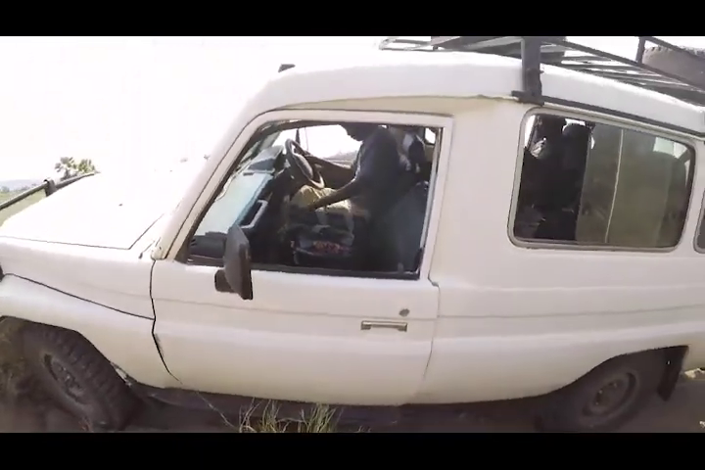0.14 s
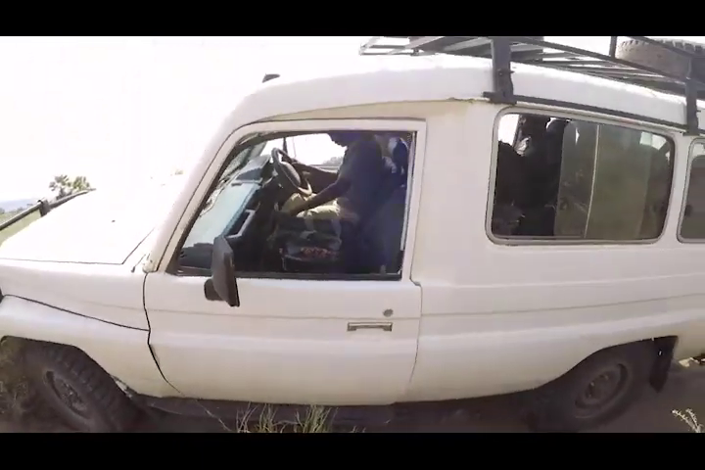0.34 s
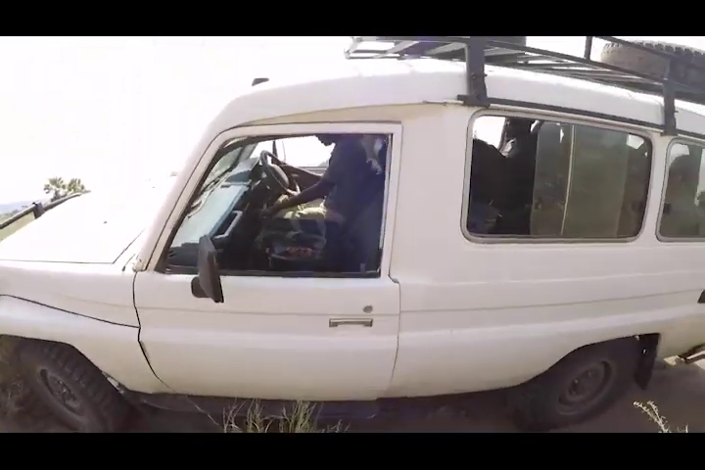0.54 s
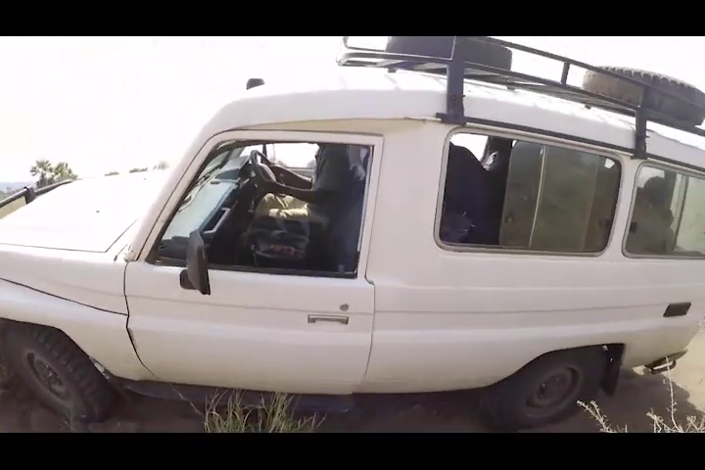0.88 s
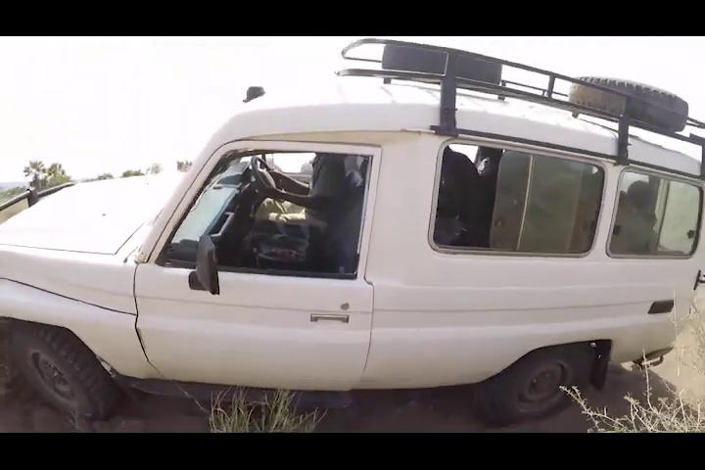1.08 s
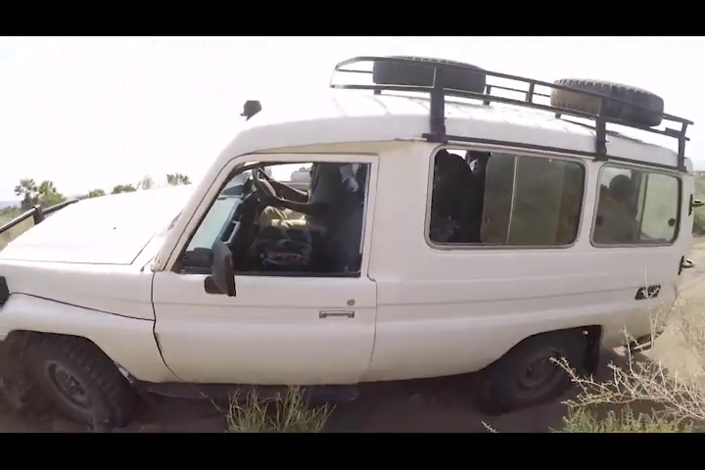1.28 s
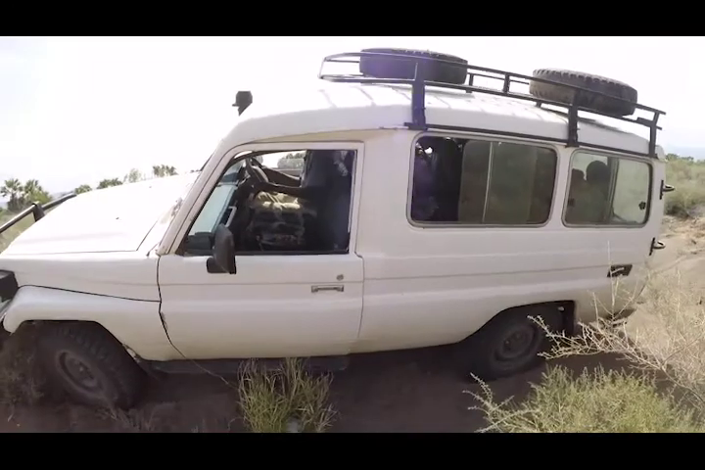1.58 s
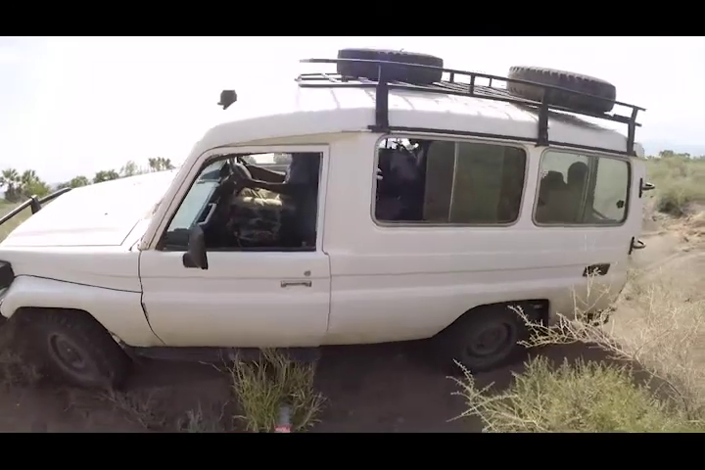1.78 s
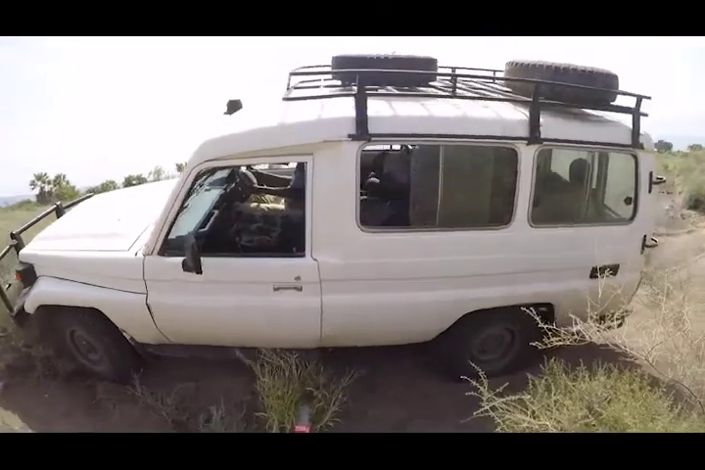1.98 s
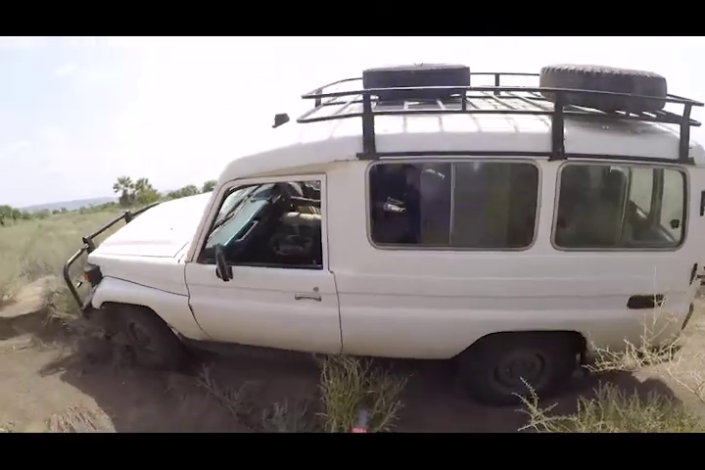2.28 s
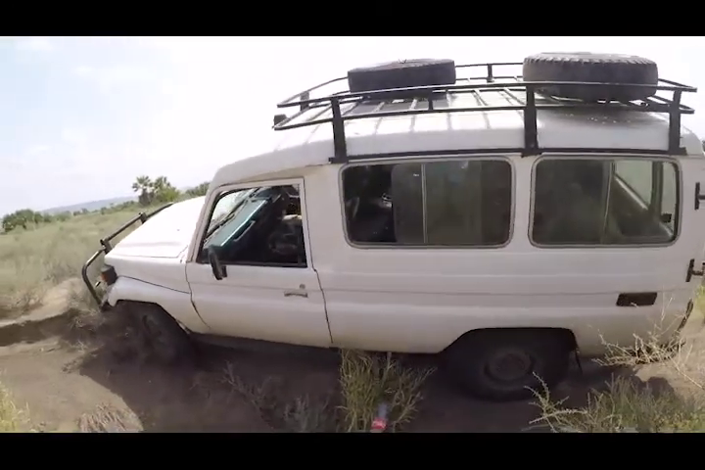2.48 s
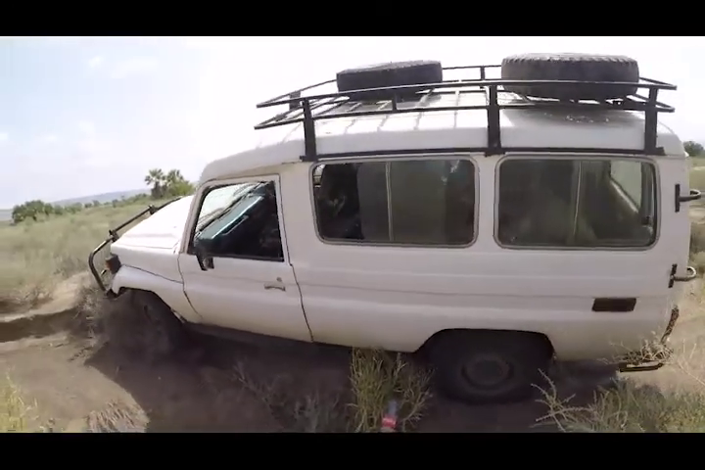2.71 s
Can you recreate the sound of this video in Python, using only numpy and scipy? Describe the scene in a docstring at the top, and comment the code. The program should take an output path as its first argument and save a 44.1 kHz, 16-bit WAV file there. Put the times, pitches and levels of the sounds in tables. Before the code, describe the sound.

A diesel four-wheel-drive labours at low revs, then revs up, pulling away through sand.

```python
"""A six-cylinder diesel four-wheel-drive labours at low revs, then pulls away through soft sand, close by.
Firings boom through the exhaust, rattle the block and shake the panels; the intake hisses.
Tyres churn sand, air buffets the microphone and the body clunks.
Near the end dry twigs snap and a thin squeal starts at high revs."""
import sys
import numpy as np
from scipy import signal
from scipy.fft import rfft, irfft, next_fast_len
from scipy.io import wavfile
from scipy.ndimage import uniform_filter1d

SR = 44100
rng = np.random.default_rng(int(sys.argv[2]) if len(sys.argv) > 2 else 0)


def to_wav(s):
    """Save 16-bit WAV."""
    ch = np.atleast_2d(s).T  # columns
    pcm = np.round(np.clip(ch, -1, 1) * 32767)  # PCM
    wavfile.write(sys.argv[1], SR, pcm.astype(np.int16))


N = 125685

# engine speed (time [s], firing rate [Hz])
FIRING_HZ = [(0, 32), (.25, 38.8), (.4, 37.8), (.55, 30.1), (.71, 29.2), (.83, 29.7), (1.01, 38.1),
             (1.12, 39.3), (1.43, 41.1), (1.59, 46), (1.82, 46.3), (2.0, 47.7), (2.14, 52.7), (2.28, 61.8),
             (2.53, 70.8), (2.63, 79), (2.76, 87.1), (2.85, 85.5)]
# exhaust drive (time [s], level [dB])
LOAD_DB = [(0, -39), (.3, -42), (.65, -37), (1.05, -33.5), (1.3, -33.5), (1.7, -24.5), (1.9, -25.5),
           (2.1, -26.5), (2.35, -30.5), (2.55, -26.5), (2.72, -17.5), (2.85, -19)]
# exhaust and underbody response (frequency [Hz], gain [dB])
PIPE_RESPONSE = [(12, -20), (28, 9.5), (36, 7), (45, 0.5), (53, 11), (61, 3.5), (72, 6), (86, -0.5),
                 (98, -8.8), (119, 3.1), (139, 2), (155, 0), (171, -1.4), (190, 2.5), (212, 2), (232, -5),
                 (260, -6), (340, -13.5), (450, -20), (700, -27)]
# firing-rate harmonics, lowest first (gain [dB])
HARMONIC_DB = [3, 4.5, 4, -1, -2.5, -2.5, -4.5, -2, 0.5]
# extra on the second harmonic (time [s], gain [dB])
SECOND_HARMONIC_DB = [(0, -3.5), (.25, -3.5), (.45, 3), (.7, -1.5), (1.1, 1.5), (1.5, -3), (1.75, -5),
                      (2.1, -1), (2.33, 6), (2.55, -3.5), (2.7, 0), (2.85, -2.5)]
# knock per cylinder, in firing order (gain [dB])
CYLINDER_KNOCK_DB = [-0.49, -1.7, -0.1, 1, 0.78, -2]
# combustion clatter (time [s], level [dB])
CLATTER_DB = [(0, -54), (.14, -42.5), (.3, -42.5), (.45, -45.5), (.51, -42.5), (.68, -42.5), (.92, -44),
              (1.02, -37), (1.08, -40), (1.17, -38.5), (1.35, -39.5), (1.55, -35), (1.8, -38),
              (1.89, -36.5), (2.1, -40), (2.85, -38.5)]
# block response (frequency [Hz], gain [dB])
BLOCK_RESPONSE = [(60, -48.5), (200, -17.5), (450, 1), (950, -7.5), (1300, -0.5), (1540, 1.5), (1800, -4),
                  (2080, -3), (2600, -15.5), (3200, -24.5), (6000, -24), (12000, -37.5), (20000, -92)]
# intake and injector hiss (time [s], level [dB])
HISS_DB = [(0, -48.5), (.3, -48), (.5, -50.5), (.9, -47.5), (1.15, -45), (1.6, -41.5), (2.1, -41),
           (2.45, -39), (2.85, -37.5)]
# hiss (frequency [Hz], gain [dB])
HISS_SPECTRUM = [(500, -55), (1500, -1), (3200, -13), (4200, -3), (5100, -2.5), (5650, 1.5), (6400, -6),
                 (7200, -8.5), (9000, -10.5), (11500, -22), (13200, -20.5), (15500, -34)]
# body and chassis rumble (time [s], level [dB])
RUMBLE_DB = [(0, -41), (.5, -33.5), (.9, -32.5), (1.35, -28), (1.55, -23), (2.0, -26.5), (2.3, -27),
             (2.6, -22), (2.85, -18)]
# rumble (frequency [Hz], gain [dB])
RUMBLE_SPECTRUM = [(20, -44), (80, 5.5), (190, -1), (300, -3.5), (410, -8), (520, -21), (800, -25),
                   (2000, -52), (20000, -120)]
# booming panels (frequency [Hz], width [Hz], gain [dB])
BODY_MODES = [(177.4, 10.5, 11), (228, 11, -1), (296.7, 17.7, 3.5), (343.4, 17, 1.5), (414.5, 66, -7)]
# churned sand (time [s], level [dB])
SAND_DB = [(0, -45.5), (1.2, -47), (1.6, -39.5), (2.1, -39), (2.3, -35), (2.55, -33), (2.75, -29.5),
           (2.85, -28)]
# sand (frequency [Hz], gain [dB])
SAND_SPECTRUM = [(200, -9), (500, -0.5), (780, -2), (1050, -2), (1400, -10), (2300, -15), (3200, -20.5),
                 (7000, -47.5), (15000, -43)]
# air on the microphone (time [s], level [dB])
WIND_DB = [(0, -35), (.4, -37.5), (.65, -24.5), (1.1, -28.5), (1.5, -22), (1.95, -39), (2.17, -12),
           (2.4, -29), (2.85, -28)]
# buffeting (frequency [Hz], gain [dB])
WIND_SPECTRUM = [(6, -12.5), (18, -1), (32, 16), (50, 11), (90, 1.5), (250, -56), (20000, -160)]
# body clunks (time [s], level [dB], rise [s], decay [s], treble [dB], ring [Hz])
CLUNK_EVENTS = [(0.244, -25, 0.011, 0.02, -7, 1020), (0.395, -26.5, 0.0066, 0.01, -3.5, 2450),
                (2.361, -25, 0.00074, 0.0092, 1, 758), (2.377, -19, 0.0037, 0.0083, -12, 786)]
# clunk (frequency [Hz], gain [dB])
CLUNK_SPECTRUM = [(100, 10), (300, 9), (600, 5), (800, 3), (1400, 3), (2400, 2), (3300, -9.5), (5200, 0),
                  (7500, -14), (14000, -53)]
# snapping twigs (time [s], level [dB], decay [s], centre [Hz])
TWIG_SNAPS = [(2.4793, -23, .0007, 7500), (2.4903, -22.5, .0007, 7500), (2.540, -33, .002, 6000),
              (2.585, -28, .002, 6200), (2.591, -32, .002, 8000), (2.643, -30, .0015, 9000),
              (2.660, -25, .002, 6500), (2.688, -24, .002, 5100), (2.765, -37, .001, 13000)]
# squeal (time [s], pitch [Hz], level [dB])
SQUEAL_TRACK = [(2.45, 5620, -110), (2.58, 5641, -40), (2.68, 5724, -43), (2.72, 5900, -35.5),
                (2.79, 5790, -35), (2.82, 5830, -29.5), (2.85, 6024, -33)]


def undb(db):
    return 10 ** (np.asarray(db) / 20)


def curve(rows, column=1):
    """Table column at every sample."""
    rows = np.array(rows, float)
    return np.interp(np.arange(N) / SR, rows[:, 0], rows[:, column])


def unit_rms(x):
    return x / np.sqrt(np.mean(x ** 2) + 1e-18)


def noise():
    return rng.standard_normal(N)


def walk(rate_hz):
    """Smooth random motion, RMS 1."""
    size = max(int(SR / rate_hz), 1)
    return unit_rms(uniform_filter1d(uniform_filter1d(noise(), size), size))


def colour(x, points):
    """Minimum-phase filter through points (frequency [Hz], gain [dB])."""
    size = 2 * next_fast_len(N)
    hz, db = np.array(points, float).T
    bin_hz = np.maximum(np.arange(size // 2 + 1) * SR / size, 1)
    gain = undb(np.interp(np.log(bin_hz), np.log(hz), db))
    cepstrum = irfft(np.log(gain))
    cepstrum[1:size // 2] *= 2
    cepstrum[size // 2 + 1:] = 0
    return irfft(rfft(x, size) * np.exp(rfft(cepstrum)))[:N]


def treble(x, cutoff_hz):
    """Zero-phase high-pass."""
    bin_hz = np.arange(N // 2 + 1) * SR / N
    return irfft(rfft(x) * (1 - 1 / (1 + (bin_hz / cutoff_hz) ** 4)), N)


def ringing(x, modes):
    """Input plus the modes it excites."""
    return x + sum(undb(db) * signal.lfilter(*signal.iirpeak(hz, hz / width_hz, fs=SR), x)
                   for hz, width_hz, db in modes)


def burst(peak_s, rise_s, decay_s):
    """Exponential rise and decay."""
    t = np.arange(N) / SR - peak_s
    return np.exp(np.minimum(t / rise_s, -t / decay_s))


def grains(per_s, spread_db):
    """Random clicks of uneven size."""
    clicks = (rng.random(N) < per_s / SR) * np.sign(noise())
    return clicks * undb(spread_db * np.minimum(rng.exponential(size=N), 4))


def exhaust(firing_hz, cycles, lope_db=-15, trim_db=-0.5):
    """Firing harmonics climb through the pipe's resonances; uneven cylinders add lines between them."""
    flutter_hz, flutter_rad, flutter_db = 22, 0.16, 1.8
    pipe_hz, pipe_db = np.array(PIPE_RESPONSE, float).T
    rolloff_db_per_oct = np.interp(firing_hz, [40, 53.5], [4.5, 0])  # duller at low revs
    out = np.zeros(N)
    for k, harmonic_db in enumerate(HARMONIC_DB, 1):
        for multiple, offset_db in ((k, 0), (k - 0.5, lope_db)):
            db = harmonic_db + offset_db - rolloff_db_per_oct * np.log2(max(multiple / 2, 1))
            db += np.interp(np.log(multiple * firing_hz), np.log(pipe_hz), pipe_db)
            if multiple == 2:
                db += curve(SECOND_HARMONIC_DB)
            phase = 2 * np.pi * (multiple * cycles + rng.random())
            phase += flutter_rad * np.sqrt(multiple) * walk(flutter_hz)
            out += undb(db + flutter_db * walk(flutter_hz)) * np.sin(phase)
    return np.sqrt(2) * out * undb(curve(LOAD_DB) + trim_db)


def firings(cycles, jitter_cycles=0.052, scatter_db=3):
    """One pulse per firing, uneven in time and strength."""
    k = np.arange(int(cycles[-1]) + 1)
    lateness, strength = rng.standard_normal((len(k), 2)).T
    at_sample = np.interp(k + jitter_cycles * lateness, cycles, np.arange(N)).astype(int)
    db = np.array(CYLINDER_KNOCK_DB)[k % len(CYLINDER_KNOCK_DB)] + scatter_db * strength
    return np.bincount(at_sample, undb(db), N)


def engine_bay(firing_hz, cycles, delay_cycles=0.14, decay_s=0.01, hiss_depth=0.46):
    """Each combustion rattles the block and pulses the intake and injector hiss."""
    blows = firings(cycles - delay_cycles) / (firing_hz * decay_s)
    knocks = signal.lfilter([1], [1, -np.exp(-1 / (decay_s * SR))], blows)
    envelope = unit_rms(1 + uniform_filter1d(knocks, size=90))
    clatter = unit_rms(colour(noise() * envelope, BLOCK_RESPONSE))
    hiss = unit_rms(colour(noise() * (1 - hiss_depth + hiss_depth * envelope), HISS_SPECTRUM))
    return clatter * undb(curve(CLATTER_DB)) + hiss * undb(curve(HISS_DB))


def chassis(cycles, throb_depth=0.31):
    """Panels and chassis rumble, shaken once per firing."""
    throb = 1 + throb_depth * np.cos(2 * np.pi * cycles)
    shake = colour(noise() * throb, RUMBLE_SPECTRUM)
    return unit_rms(ringing(shake, BODY_MODES)) * undb(curve(RUMBLE_DB))


def tyres(patchy_db=1.0):
    """Sand crunches unevenly under the tread."""
    crunch = unit_rms(colour(grains(per_s=2500, spread_db=1.5), SAND_SPECTRUM))
    return crunch * undb(curve(SAND_DB) + patchy_db * walk(rate_hz=20))


def wind():
    """Air buffets the microphone: low noise."""
    return unit_rms(colour(noise(), WIND_SPECTRUM)) * undb(curve(WIND_DB))


def clunks(ring_width_hz=100, ring_db=4.5):
    """Short, dead knocks from drivetrain and body."""
    out = np.zeros(N)
    for at_s, db, rise_s, decay_s, treble_db, ring_hz in CLUNK_EVENTS:
        thud = colour(noise(), CLUNK_SPECTRUM)
        knock = unit_rms(ringing(thud, [(ring_hz, ring_width_hz, ring_db)]))
        knock += (undb(treble_db) - 1) * treble(knock, cutoff_hz=1170)
        out += knock * undb(db) * burst(at_s, rise_s, decay_s)
    return out


def brushwood(rustle_at_s=2.64, rustle_sigma_s=0.064, rustle_db=-56, snap_rise_s=0.0001):
    """Dry twigs snap amid a short rustle."""
    t = np.arange(N) / SR
    rustle = unit_rms(treble(grains(per_s=900, spread_db=4), cutoff_hz=6000))
    swell = np.exp(-((t - rustle_at_s) / rustle_sigma_s) ** 2 / 2)
    out = rustle * undb(rustle_db) * swell
    for at_s, db, decay_s, centre_hz in TWIG_SNAPS:
        crack = signal.lfilter(*signal.iirpeak(centre_hz, Q=2.5, fs=SR), noise())
        out += unit_rms(crack) * undb(db) * burst(at_s, snap_rise_s, decay_s)
    return out


def squeal(cycles, wobble_hz=79, wander_hz=102.2, pulse_depth=0.5):
    """Thin squeal, probably a slipping belt; chirps with each firing."""
    beat = np.cos(2 * np.pi * cycles)
    pitch_hz = curve(SQUEAL_TRACK) + wobble_hz * beat + wander_hz * walk(rate_hz=510)
    tone = np.sin(2 * np.pi * np.cumsum(pitch_hz) / SR)
    return unit_rms(tone * (1 + pulse_depth * beat)) * undb(curve(SQUEAL_TRACK, column=2))


def scene():
    """Mono mix; one firing clock drives all engine layers."""
    firing_hz = curve(FIRING_HZ)
    cycles = np.cumsum(firing_hz) / SR  # one cycle per firing
    engine = exhaust(firing_hz, cycles) + engine_bay(firing_hz, cycles) + chassis(cycles)
    return (engine + tyres() + wind() + clunks() + brushwood() + squeal(cycles))[None]


def record(dry):
    """Steep low-pass."""
    cutoff_hz = 15000
    return signal.sosfilt(signal.ellip(8, 0.2, 80, cutoff_hz, fs=SR, output="sos"), dry)


dry = scene()
out = record(dry)
to_wav(out)
```